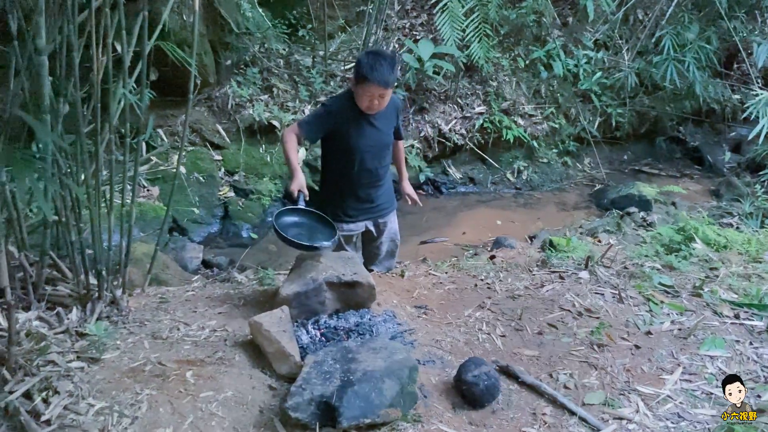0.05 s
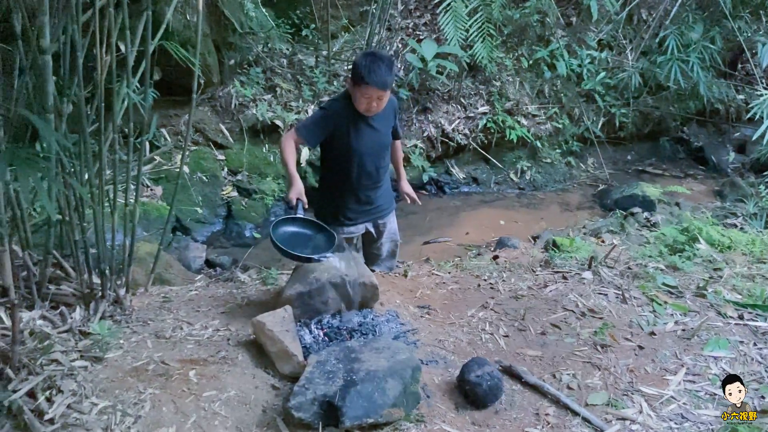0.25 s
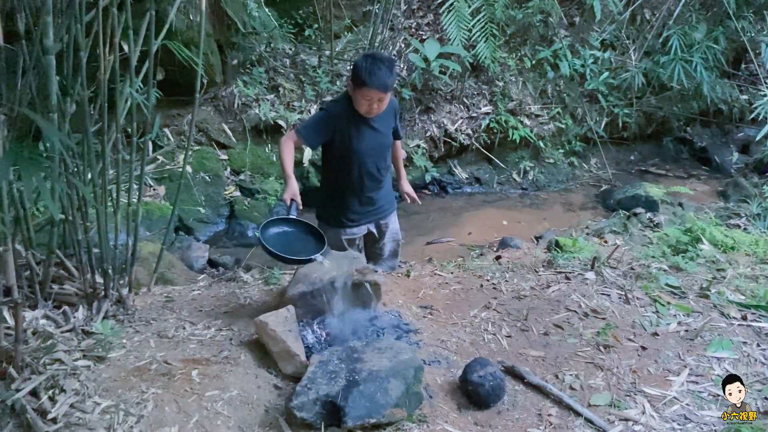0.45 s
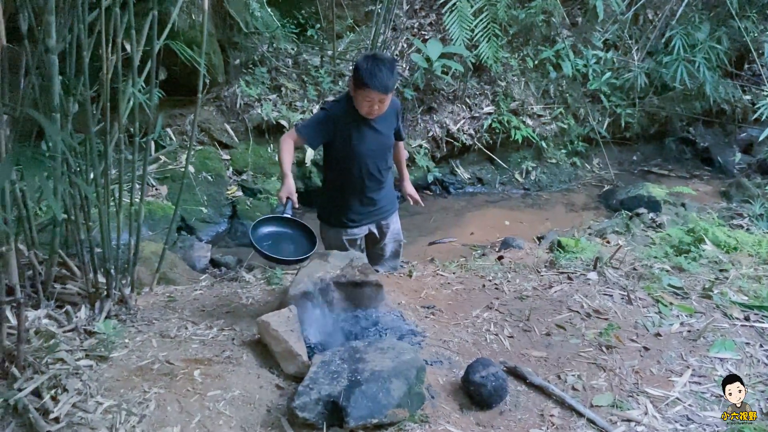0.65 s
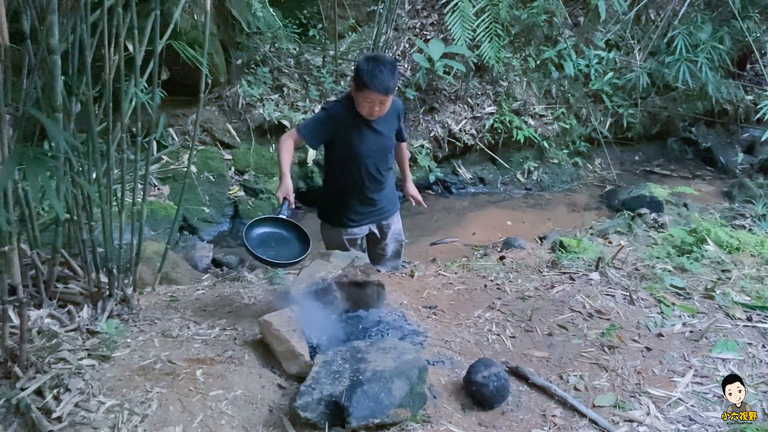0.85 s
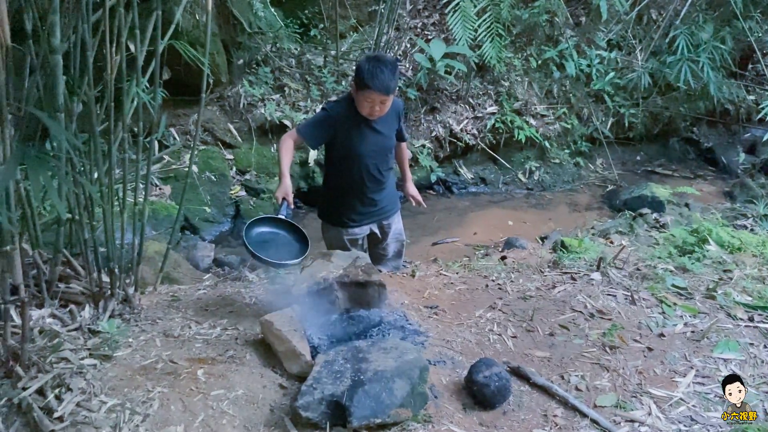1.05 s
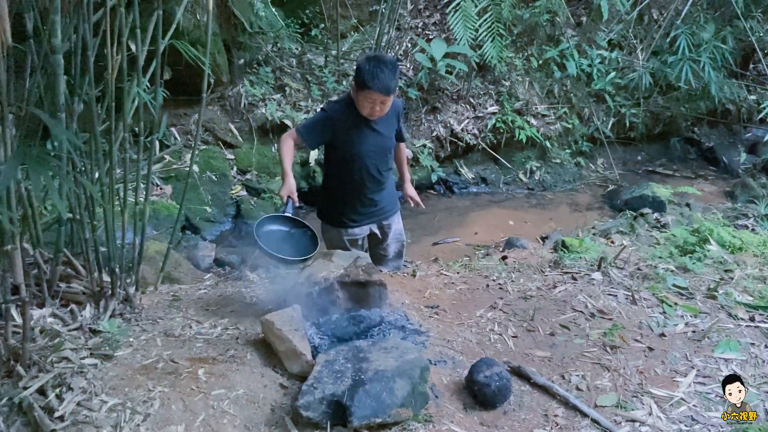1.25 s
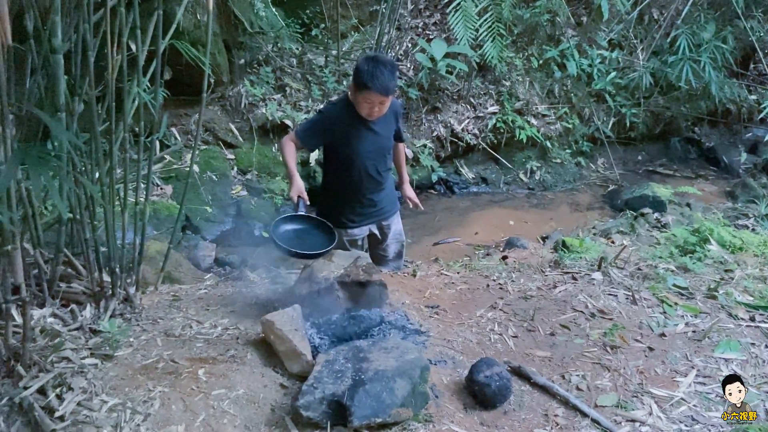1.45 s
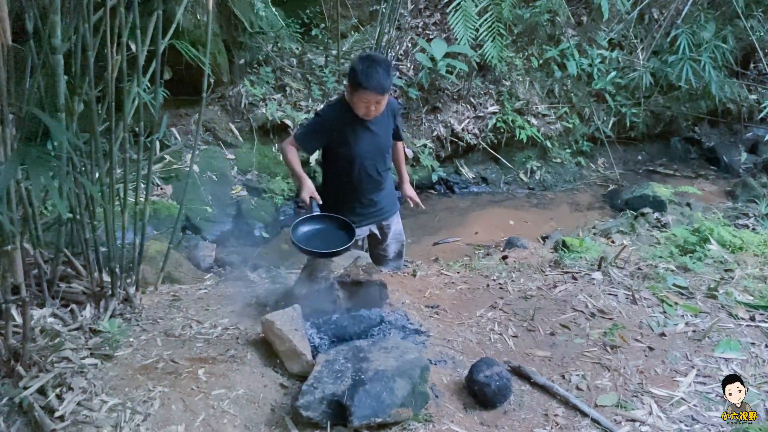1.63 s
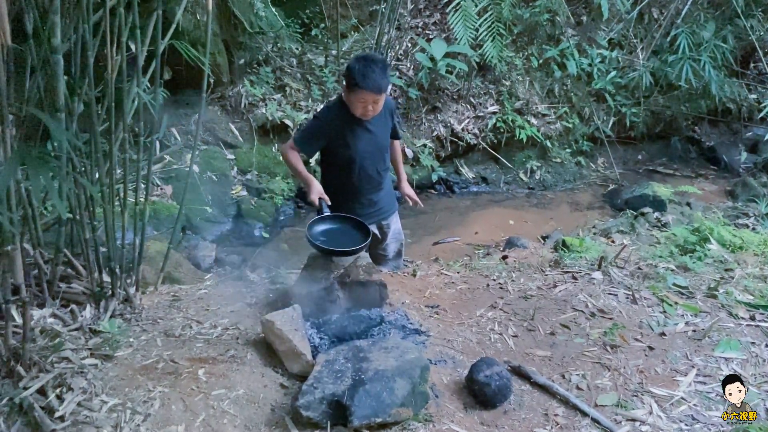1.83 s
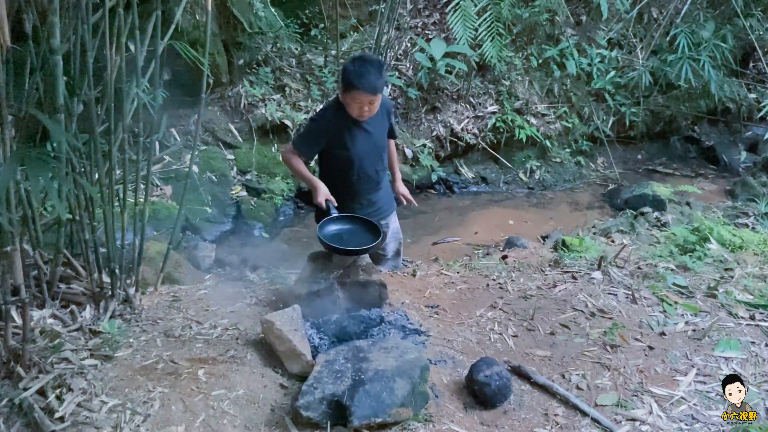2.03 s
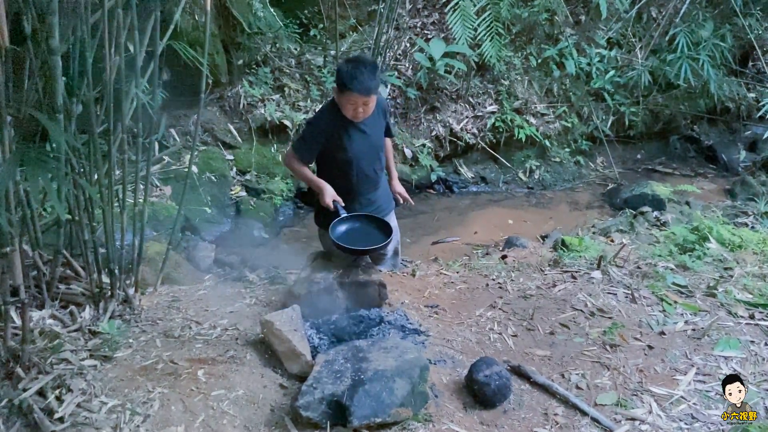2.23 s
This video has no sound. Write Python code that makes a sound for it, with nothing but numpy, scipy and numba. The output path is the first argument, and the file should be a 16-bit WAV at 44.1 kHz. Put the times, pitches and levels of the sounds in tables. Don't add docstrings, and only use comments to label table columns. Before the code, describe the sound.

Water hisses and burbles on hot charcoal, steam fading, while cicadas drone beside a quiet stream.

```python
import sys
import numpy as np
from scipy import signal
from scipy.fft import rfft, irfft, next_fast_len
from scipy.io import wavfile
from scipy.ndimage import uniform_filter1d
from numba import njit

SR = 44100
rng = np.random.default_rng(int(sys.argv[2]) if len(sys.argv) > 2 else 0)


def bounce(signal):
    frames = np.transpose(np.atleast_2d(signal))
    limited = np.clip(frames, -1, 1)
    pcm = np.round(limited * 32767).astype(np.int16)
    wavfile.write(sys.argv[1], SR, pcm)


def makeup_ratio(level_db):
    decades = np.asarray(level_db, float) / 20
    return 10 ** decades


N = 100856
M = next_fast_len(N)

# [f/Hz, likeness 0-1]
FOREST_LIKENESS = [(60, 0.7), (400, 0.43), (800, 0.28), (2500, 0.96), (3700, 0.41), (5500, 0.4),
                   (7000, 0.84), (9000, 0.66)]


def over_hz(table):
    hz, value = np.array(table, float).T
    return np.interp(np.log(np.arange(M // 2 + 1) * SR / M + 1), np.log(hz), value)


def over_s(table, col):
    rows = np.array(table, float)
    return np.interp(np.arange(N) / SR, rows[:, 0], rows[:, col])


def unit(x):
    return x / np.sqrt(np.mean(x ** 2))


def colour(x, table):
    return unit(irfft(rfft(x, M) * makeup_ratio(over_hz(table)), M)[:N])


def walk(rate):
    hold = int(SR / rate)
    steps = np.repeat(rng.standard_normal(N // hold + 1), hold)
    return 1.08 * uniform_filter1d(uniform_filter1d(steps, hold), hold)[:N]


@njit
def svf(x, hz, width):
    y, band, low = np.empty(len(x)), 0., 0.
    for i in range(len(x)):
        g, k = np.tan(np.pi * hz[i] / SR), width / hz[i]
        v = (band + g * (x[i] - low)) / (1 + g * (g + k))
        band, low, y[i] = 2 * v - band, low + 2 * g * v, k * v
    return y


def grains(rate, spread_db, share, smear_s):
    at, size = rng.random((2, 4000))
    used = np.arange(4000) < rate * N / SR
    puffs = np.zeros(N)
    np.add.at(puffs, (at * N).astype(int), used * makeup_ratio(-spread_db * np.log(size + .02)))
    puffs = signal.lfilter([1], [1, -np.exp(-1 / (smear_s * SR))], puffs)
    share = np.clip(share, 0, 1)
    return np.sqrt(1 - share + share * unit(puffs) ** 2)


def ports(make, alike, left=((100, 0), (200, 0))):
    # [f/Hz, lead/rad]
    port_lead = [(0, 0), (1700, 1.4), (2200, .5), (2800, 1.4), (3500, .1), (4700, 1.1), (5400, 3.3),
                 (6500, 6.2), (7030, 6.28), (15570, -6.28)]
    likeness = np.clip(over_hz(alike), 0, 1)
    hz, rad = np.array(port_lead, float).T
    lead = np.exp(.5j * np.interp(np.arange(M // 2 + 1) * SR / M, hz, rad))
    both, left_own, right_own = (rfft(make(), M) for _ in range(3))
    pan = makeup_ratio(over_hz(left) / 2)
    shared, apart = np.sqrt(likeness) * both, np.sqrt(1 - likeness)
    left_port = pan * (shared * lead + apart * left_own)
    right_port = (shared / lead + apart * right_own) / pan
    return irfft(np.array([left_port, right_port]), M)[:, :N]


def stream():
    # [f/Hz, level/dB per Hz]
    gurgle_tone = [(20, -36), (45, -2.5), (180, -9.5), (380, -3), (520, -7), (620, -16.5), (1500, -14),
                   (2500, -26)]
    riffle_tone = [(1500, -18), (1950, 2), (2150, -7), (2800, -22), (4500, 5.5), (7000, 1), (11000, -1.5),
                   (16000, 0)]
    gurgle_db, riffle_db = -69, -58
    bubbling = grains(75, 1.0, 0.13, smear_s=0.0042)
    swell = makeup_ratio(.5 * walk(4))

    def once():
        gurgle = colour(rng.standard_normal(N) * bubbling, gurgle_tone) * makeup_ratio(gurgle_db)
        riffle = colour(rng.standard_normal(N), riffle_tone) * makeup_ratio(riffle_db)
        return swell * (gurgle + riffle)
    return ports(once, FOREST_LIKENESS)


def tymbal(hz, width_hz):
    clicks_per_s, jitter, scatter_db = 170, .25, 3
    gap, size = rng.standard_normal((2000, 2)).T
    at = np.cumsum(SR / clicks_per_s * np.exp(jitter * gap)).astype(int)
    at -= at[0]
    clicks = np.zeros(N)
    clicks[at[at < N]] = makeup_ratio(scatter_db * size[at < N])
    leaves = rng.standard_normal(2048) * np.exp(-np.arange(2048) / SR / 0.0091)
    smeared = signal.fftconvolve(clicks, leaves)[:N]
    return unit(svf(svf(smeared, hz, 1. * width_hz), hz, 1. * width_hz))


def cicadas():
    # [t/s, level/dB]
    chorus_level = [(0, -44.5), (.3, -49.5), (.5, -48), (.75, -49.5), (1.0, -49.5), (1.3, -51), (1.6, -51),
                    (1.85, -53.5), (2.05, -61), (2.29, -53)]
    # [f/Hz, width/Hz, level/dB]
    far_singers = [(3564, 410, -5.5), (3696, 800, 6), (3843, 290, 4), (4220, 450, -7.5), (4526, 220, -7)]
    # [start/s, length/s, level/dB]
    phrases = [
        (-.45, 0.853, -45.5),
        (0.703, 0.91, -45.5),
        (1.856, .8, -43.5),
    ]
    # [ratio to gliding pitch, width/Hz, level/dB]
    near_modes = [(0.958, 324, -0.5), (1.012, 205, -3), (1.092, 307, -7.5)]
    # [f/Hz, width/Hz, level/dB]
    near_rasp = (4400, 480, -7)
    # [f/Hz, level/dB]
    canopy = [(2300, 1), (2900, 1), (3200, 1), (4600, -2), (4750, -11), (5500, -2)]
    start_hz, end_hz, glide_s, swell_s, stop_s = 3220, 3880, .3, .18, .08
    chorus_db = 3.5
    t, gain, hz = np.arange(N) / SR, np.zeros(N), np.full(N, 1. * start_hz)
    for start, length, db in phrases:
        swell = np.clip((t - start) / swell_s, 0, 1)
        stop = np.clip((start + length - t) / stop_s, 0, 1)
        gain = gain + makeup_ratio(db) * swell * stop
        glide = end_hz - (end_hz - start_hz) * np.exp(-np.abs(t - start) / glide_s)
        hz = np.where(t >= start, glide, hz)
    gain = gain * makeup_ratio(1.5 * walk(30))
    # pitch ratio, level in dB
    drift = [(1 + 0.0041 * walk(9), 1.36 * walk(6)) for _ in far_singers]

    def once():
        far = sum(tymbal(f * bend, width) * makeup_ratio(db + lump)
                  for (f, width, db), (bend, lump) in zip(far_singers, drift))
        near = sum(tymbal(ratio * hz, width) * makeup_ratio(db) for ratio, width, db in near_modes)
        rasp_hz, rasp_width, rasp_db = near_rasp
        near = near + tymbal(np.full(N, 1. * rasp_hz), rasp_width) * makeup_ratio(rasp_db)
        far = colour(far, canopy) * makeup_ratio(over_s(chorus_level, 1) + chorus_db)
        return far + colour(near, canopy) * gain
    return ports(once, FOREST_LIKENESS)


def pops():
    # [t/s, pitch/Hz, level/dB, ring to -60 dB/s]
    bubbles = [(.351, 1223, -48.5, .13), (.352, 1054, -56, 0.048), (.353, 285, -50.5, 0.098),
               (.354, 2205, -56.5, 0.18), (.405, 393, -45, 0.063), (0.434, 147, -52, 0.033),
               (0.56, 1770, -37, 0.023), (.563, 1600, -46, .02), (0.576, 303, -49.5, 0.23),
               (0.62, 131, -44, .04), (0.647, 242, -40.5, 0.025), (0.729, 136, -38, 0.024),
               (.779, 1256, -44.5, 0.048), (0.785, 1400, -49, 0.037), (.705, 137, -45, 0.064),
               (.765, 272, -62, 0.044), (.784, 312, -44, .06), (0.863, 295, -53, 0.13),
               (.942, 2220, -54, 0.033), (1.785, 800, -59, 0.049), (1.802, 497, -65.5, 0.21),
               (2.056, 292, -65, 0.046), (2.24, 386, -58, 0.026), (2.261, 340, -64, 0.12)]
    rise_s, glide, level_db = 0.0027, 0.013, 4.5
    out, t = np.zeros(N), np.arange(8192) / SR
    wobble = np.tile(.02 * walk(120), 2)
    rough = np.tile(makeup_ratio(1.5 * walk(200)), 2)
    for start, hz, db, ring_s in bubbles:
        i = int(start * SR)
        bend = 1 + glide * t / ring_s + wobble[i:i + 8192]
        tone = np.sin(2 * np.pi * hz * np.cumsum(bend) / SR) * rough[i:i + 8192]
        tone = tone * (1 - np.exp(-t / rise_s)) * 1000. ** (-t / ring_s)
        out[i:i + 8192] += makeup_ratio(db + level_db) * tone[:N - i]
    return out


def coals():
    # [t/s, boiling level/dB, steam level/dB]
    quench = [(0.3, -76, -58), (0.36, -48.5, -60.5), (0.42, -51, -57), (0.52, -51.5, -58),
              (0.582, -49, -54.5), (0.676, -48.5, -55), (0.796, -46, -56), (0.82, -49.5, -56.5),
              (0.936, -58.5, -59), (1.244, -67.5, -61), (1.416, -59.5, -63.5), (1.644, -68.5, -66.5),
              (1.704, -67.5, -66.5), (2.042, -80.5, -68.5), (2.052, -67, -68.5), (2.287, -74, -70.5)]
    # [f/Hz, level/dB per Hz]
    boil_tone = [(25, -45), (55, -1), (140, 0.5), (290, 1.5), (480, -1.5), (540, -8), (620, -42),
                 (900, -71)]
    sizzle_tone = [(520, -12), (620, -13), (900, -6), (1230, -2.5), (1550, -7.5), (2200, -3), (2900, -3),
                   (4000, -45.5)]
    steam_tone = [(2300, -31), (3200, 1.5), (5000, 0), (6100, 1), (6500, -1.5), (8400, -2), (15600, -1.5),
                  (15800, -60)]
    # [f/Hz, likeness 0-1]
    fire_likeness = [(60, 0.91), (500, 1), (650, 0.06), (1200, 1), (2000, 0.08), (5300, 0), (6800, 1),
                     (8000, 0.77)]
    # [f/Hz, left over right/dB]
    fire_left = [(100, 1.5), (450, 0.4), (750, 7), (1300, 1), (1900, 2.5), (2400, -1), (6000, 1.5),
                 (8000, 0.8)]
    boil_gain_db, sizzle_gain_db, steam_gain_db = -2.6, 3.5, 9
    sizzle_from_boil = 0.19
    t = np.arange(N) / SR
    wet = np.clip((t - 0.306) / 0.051, 0, 1)
    hissing = np.clip((t - 0.29) / 0.059, 0, 1)
    boil_db, steam_db = over_s(quench, 1), over_s(quench, 2)
    sizzle_db = sizzle_from_boil * boil_db + (1 - sizzle_from_boil) * steam_db + sizzle_gain_db
    burbles = grains(130, -1.5, 0.31, smear_s=0.0087)
    spits = grains(900, 1.5, .2, smear_s=0.006)
    low_jets, high_jets = makeup_ratio(0.49 * walk(10.8)), makeup_ratio(1.4 * walk(18))
    split = signal.butter(4, 9200, fs=SR, output='sos')

    def puffy(x):
        low = signal.sosfiltfilt(split, x)
        return low * low_jets + (x - low) * high_jets

    def once():
        noise = rng.standard_normal((3, N))
        boil = colour(noise[0] * burbles, boil_tone) * makeup_ratio(boil_db + boil_gain_db)
        sizzle = colour(noise[1] * burbles ** 0.36 * spits, sizzle_tone)
        sizzle = sizzle * makeup_ratio(sizzle_db + 0.75 * walk(13.65))
        steam = puffy(colour(noise[2] * spits ** .15, steam_tone)) * makeup_ratio(steam_db + steam_gain_db)
        return wet * (boil + sizzle) + hissing * steam
    lone = pops()
    bed = ports(once, fire_likeness, fire_left)
    return bed + ports(lambda: lone, [(100, 0.81), (200, 0.88)], fire_left)


def scene():
    return cicadas() + stream() + coals()


def without(x, bands):
    hz, gain = np.arange(M // 2 + 1) * SR / M, 1
    for lo, hi, edge in bands:
        gain = gain * np.where(hz < hi, np.clip((lo - hz) / edge, 0, 1), 1)
    return irfft(rfft(x, M) * gain, M)[:N]


def top_cut(x):
    return signal.sosfilt(signal.butter(12, 16670, fs=SR, output="sos"), x)


def record(dry):
    # [from/Hz, to/Hz, soft lower edge/Hz]
    mid_empty = [(9200, 9620, 1100), (13020, 13760, 500), (15520, 30000, 60)]
    side_empty = [(11000, 11700, 700), (15200, 30000, 450)]
    mid = without((dry[0] + dry[1]) / 2, mid_empty)
    side = without((dry[0] - dry[1]) / 2, side_empty)
    return top_cut(np.array([mid + side, mid - side]))


dry = scene()
out = record(dry)
bounce(out)
```